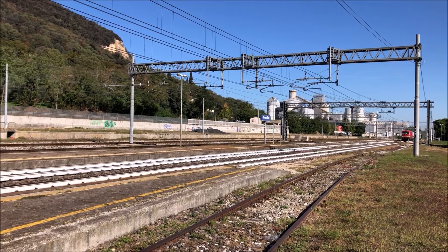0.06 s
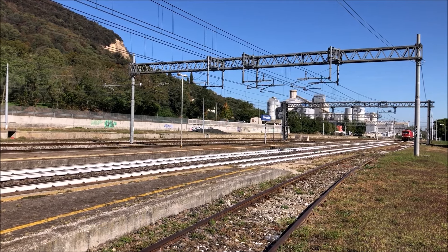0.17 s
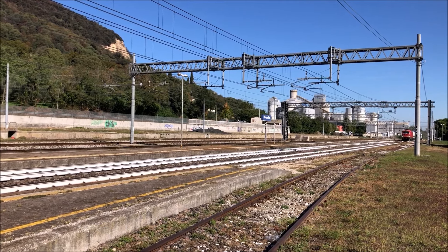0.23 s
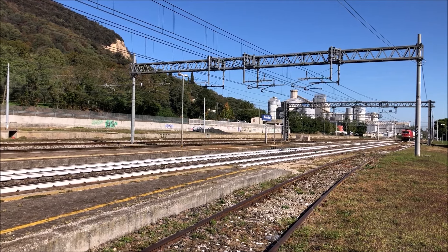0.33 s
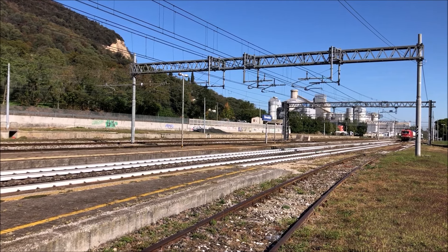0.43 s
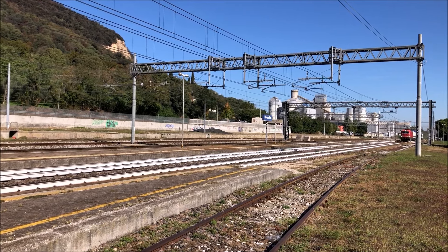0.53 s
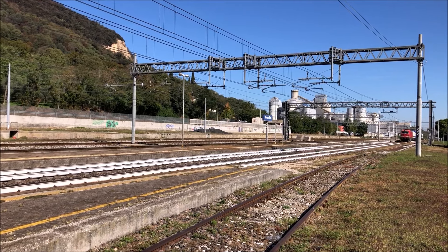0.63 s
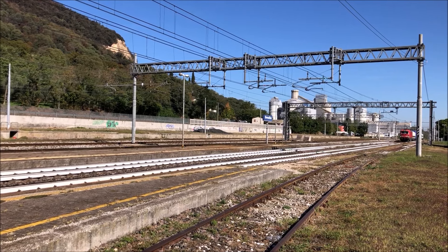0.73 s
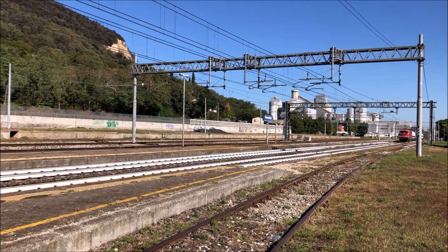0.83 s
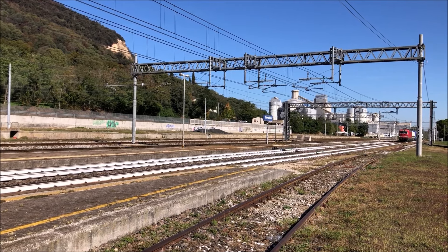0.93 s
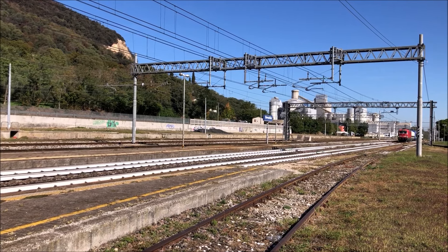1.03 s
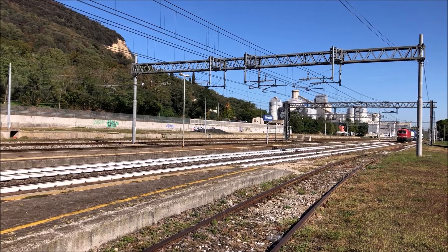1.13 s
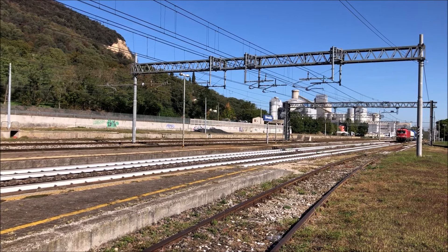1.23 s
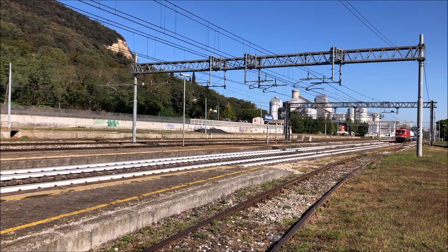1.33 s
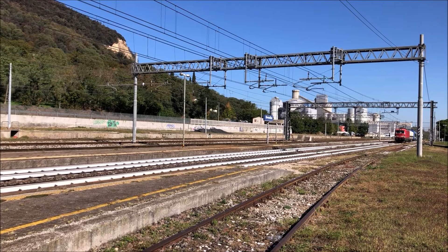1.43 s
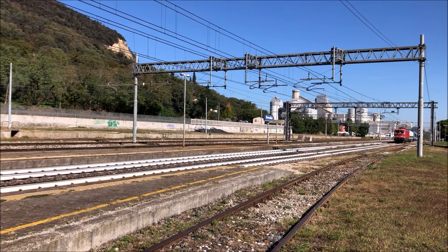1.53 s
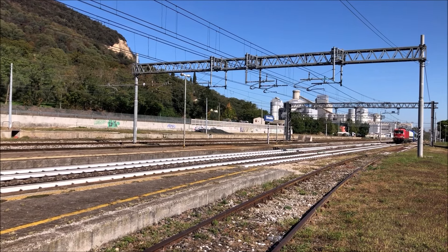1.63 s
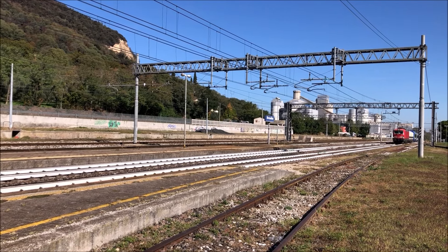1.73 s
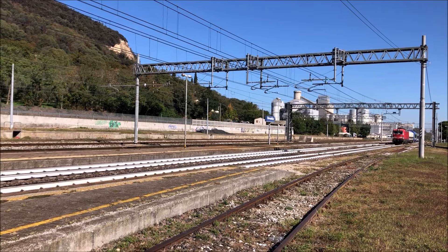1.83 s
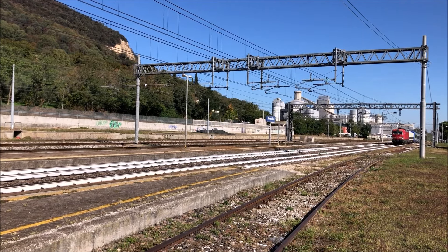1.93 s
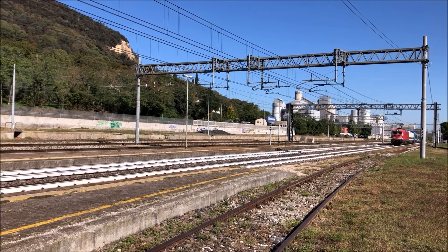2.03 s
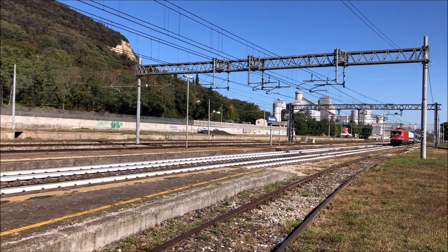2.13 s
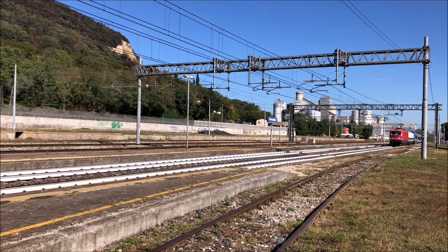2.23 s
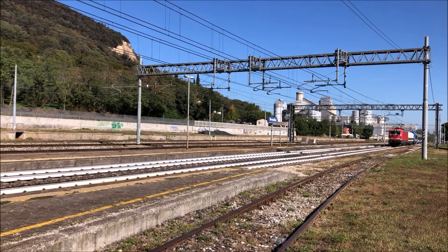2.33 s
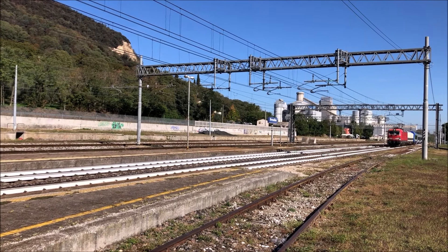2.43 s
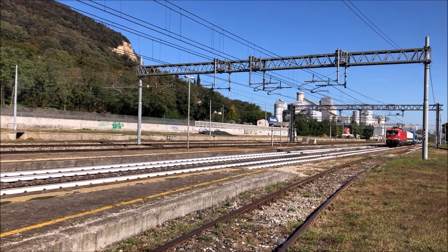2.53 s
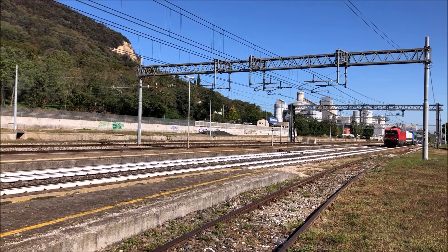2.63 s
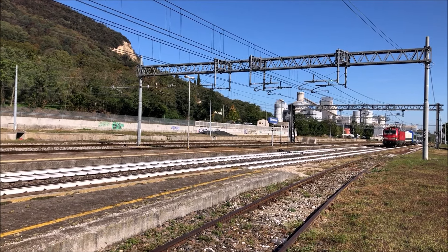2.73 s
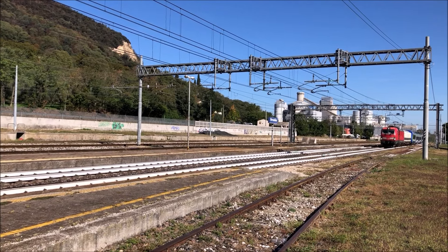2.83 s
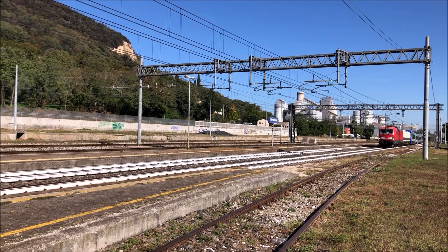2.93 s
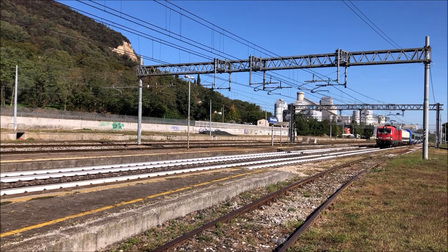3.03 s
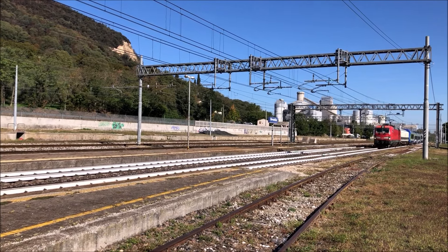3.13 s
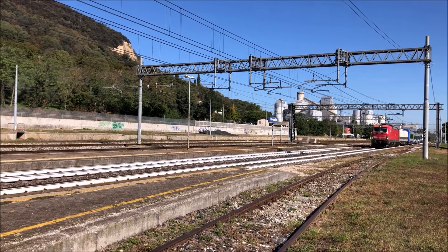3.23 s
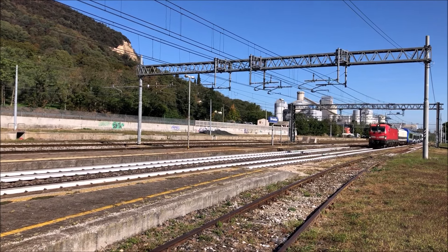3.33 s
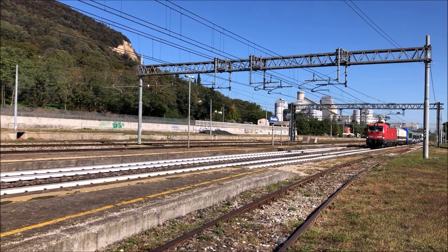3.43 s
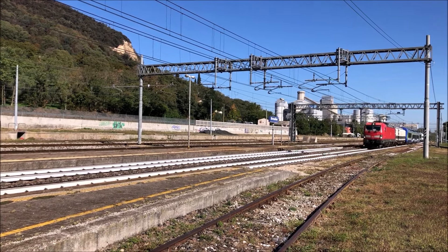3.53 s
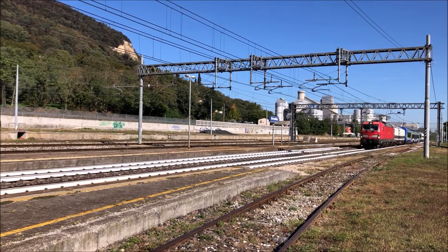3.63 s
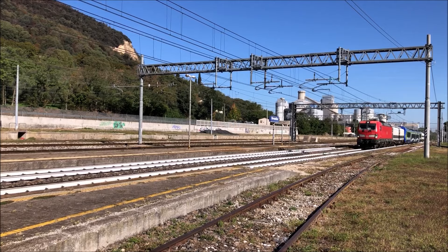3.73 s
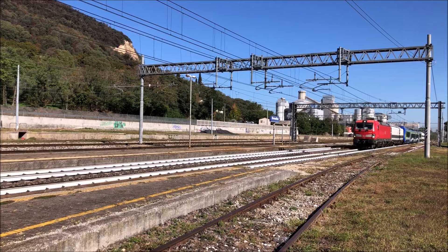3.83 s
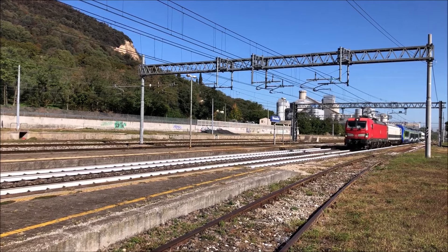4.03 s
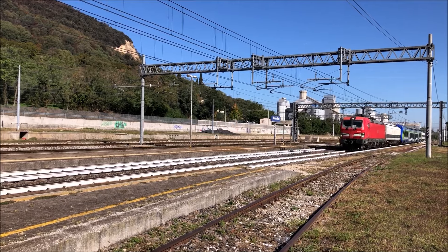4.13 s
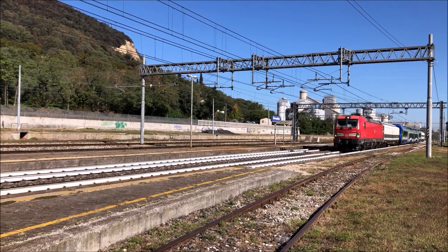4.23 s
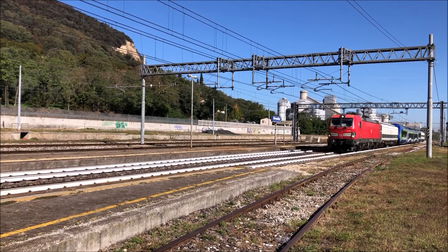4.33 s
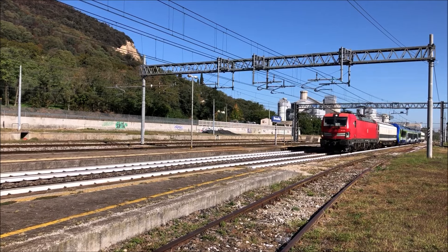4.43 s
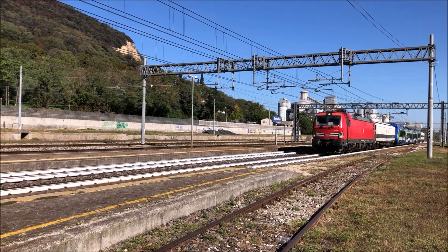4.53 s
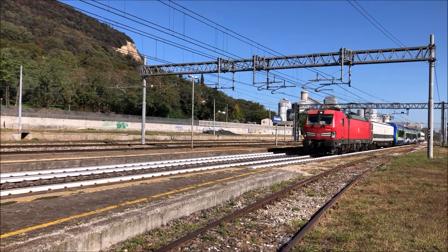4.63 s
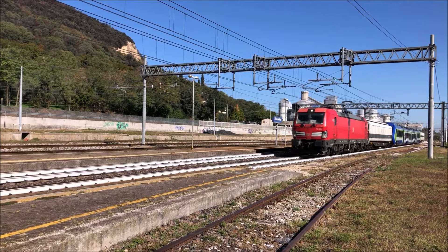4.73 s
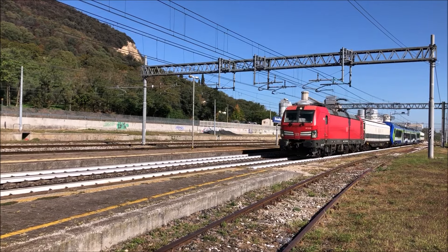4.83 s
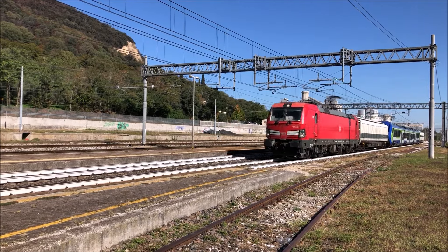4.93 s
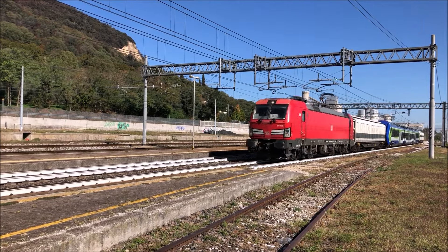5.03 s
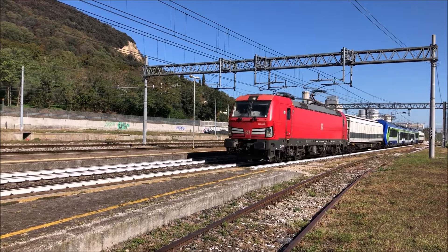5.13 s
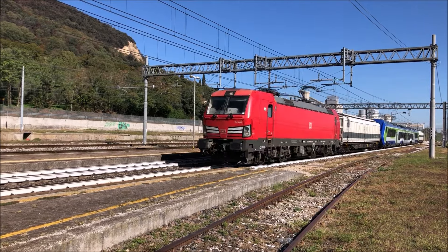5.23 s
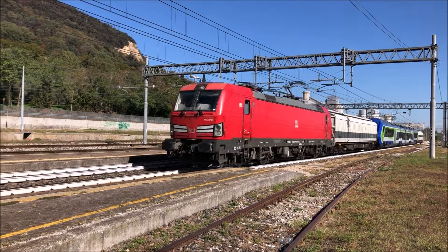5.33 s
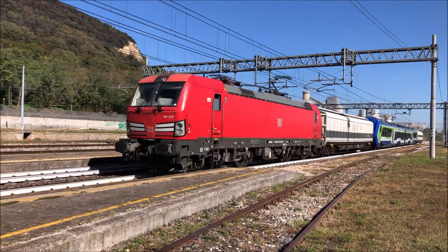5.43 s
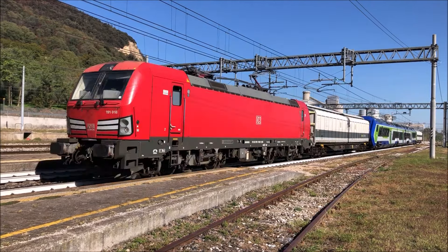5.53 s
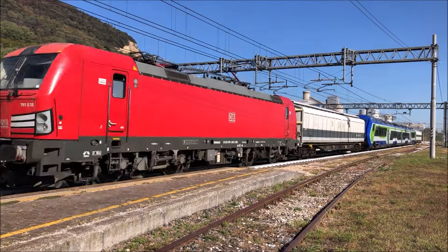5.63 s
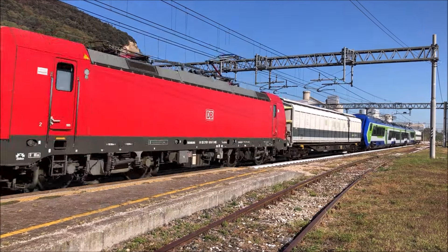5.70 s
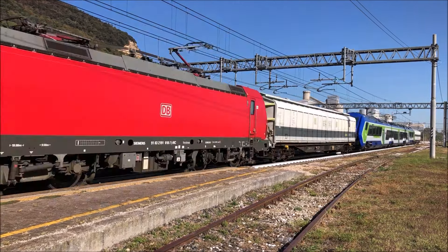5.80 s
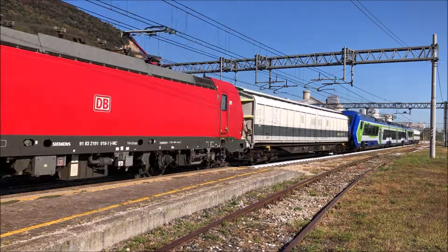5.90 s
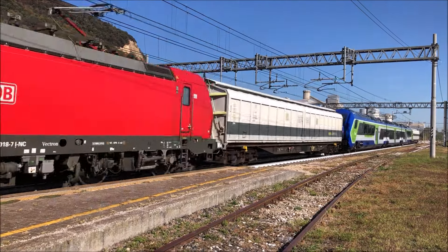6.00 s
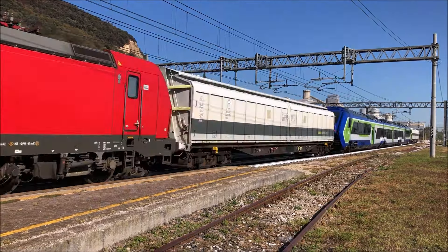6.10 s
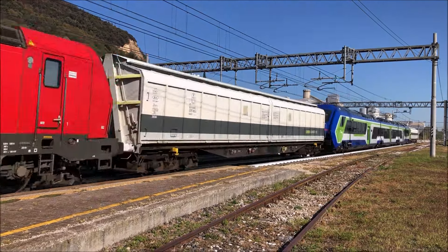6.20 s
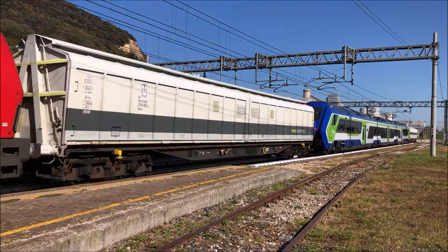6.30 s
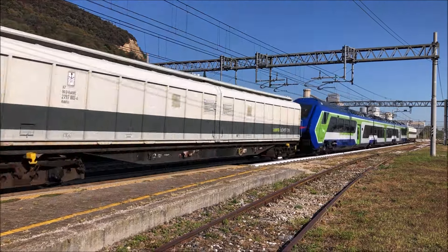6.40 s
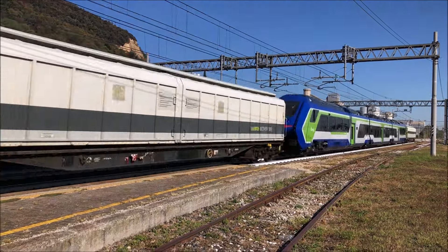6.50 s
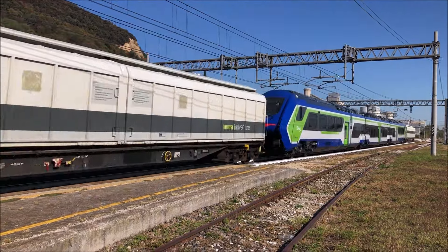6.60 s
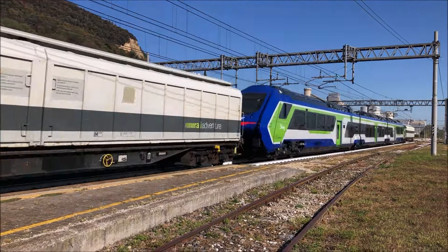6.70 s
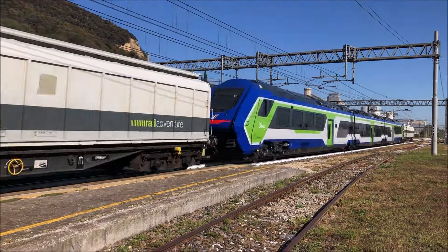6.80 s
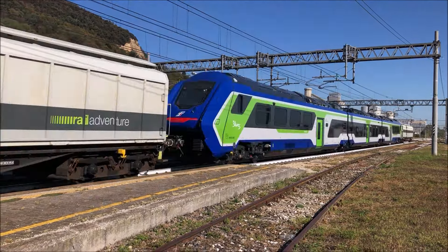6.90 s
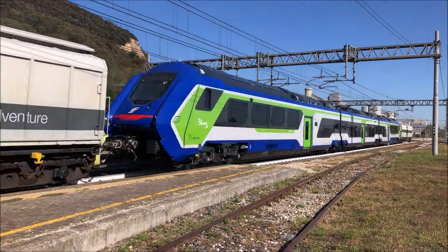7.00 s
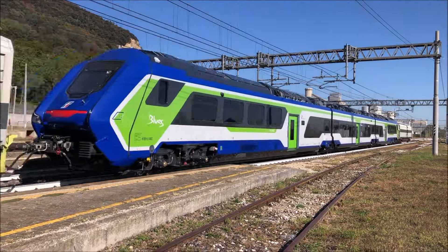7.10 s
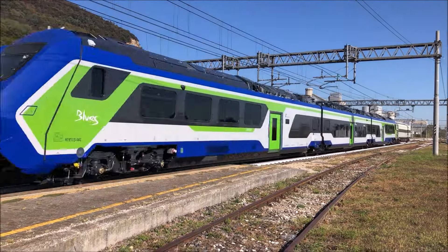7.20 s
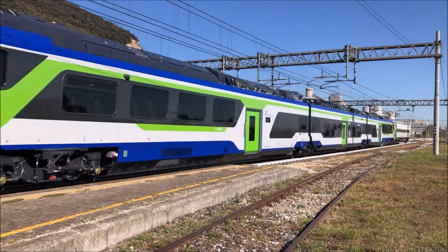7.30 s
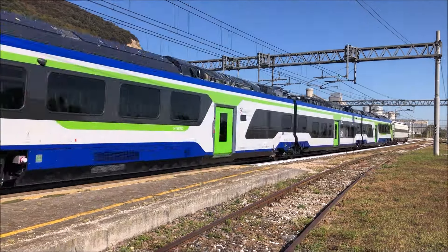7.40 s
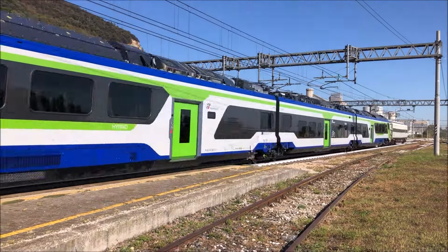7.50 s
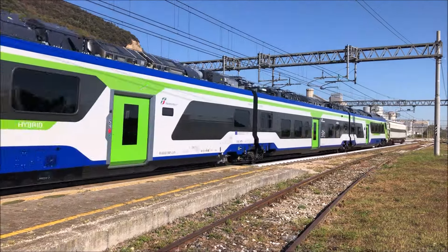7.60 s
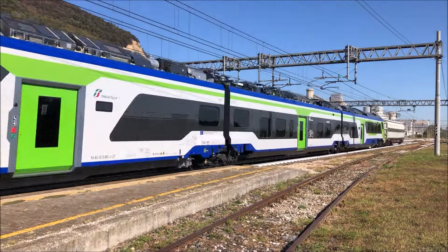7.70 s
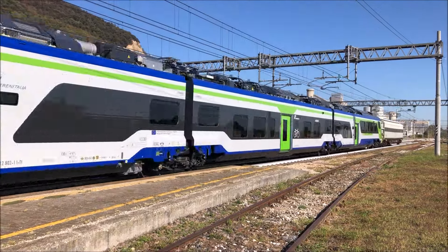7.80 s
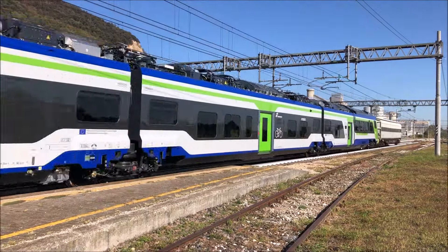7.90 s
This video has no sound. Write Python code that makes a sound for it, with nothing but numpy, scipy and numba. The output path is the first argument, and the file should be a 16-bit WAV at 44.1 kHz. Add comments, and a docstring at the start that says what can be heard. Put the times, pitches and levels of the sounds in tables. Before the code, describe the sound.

A fixed microphone beside the track picks up quiet wind rumble and soft thumps. Six bright, reedy horn calls at one pitch, the second longest, ring out with slightly lower echoes and push down the background. Soon the locomotive roars by, high wheel tones sliding downward, followed by wagons and coaches with rattling, clanking bogies still passing at the end.

```python
"""At a station platform, an electric locomotive nears at speed, sounds its air horn six times and hauls its train by.
The horn sums swept partials; delayed copies return from masts, a wall and small things, late and lower in pitch.
Coloured noise makes rumble, rolling, hiss and breeze; struck modes make the wheel clatter, slow sines the buffets.
The microphone's gain control ducks everything under the horn."""
import sys
import numpy as np
from scipy import signal
from scipy.fft import rfft, irfft, next_fast_len
from scipy.io import wavfile
from scipy.ndimage import uniform_filter1d, minimum_filter1d
from numba import njit

SR = 44100
rng = np.random.default_rng(int(sys.argv[2]) if len(sys.argv) > 2 else 0)


def store_pcm(level_fs):
    """Save levels as 16-bit WAV."""
    pcm = np.round(np.clip(level_fs, -1, 1) * 32767).astype(np.int16)
    wavfile.write(sys.argv[1], SR, np.atleast_2d(pcm).T)


N = 350595

SPEED_M_PER_S, PASS_S, TRACK_M, SOUND_M_PER_S = 26.4, 5.8, 5, 343

# breeze, gust and their spectrum: (frequency [Hz], gain [dB])
BREEZE_DB, GUST_DB, GUST_STARTS_S, GUST_ENDS_S = -44.7, -41.3, .9, 3.8
BREEZE_COLOUR = [(20, -30), (40, -14), (62, 0), (78, 0), (108, -3.5), (135, -8.5), (200, -17.5), (400, -62)]
# wind buffets: (time [s], frequency [Hz], width [s], peak level [dB])
BUFFETS = [(.92, 75, 0.017, -28.5), (1.035, 79.3, 0.0077, -25), (1.108, 122.6, 0.0067, -21),
           (1.17, 85.3, .012, -30), (1.335, 110.6, 0.014, -31.5)]

# spectra of the rolling noise: (frequency [Hz], gain [dB])
RUMBLE_COLOUR = [(20, -34), (40, -21), (62, -1.5), (78, -0.5), (108, 0), (135, -7.5), (200, -17),
                 (400, -64)]
BODY_COLOUR = [(90, -26), (160, 1), (230, -0.5), (330, -2), (410, -6.5), (540, -5), (640, -3), (760, -8.5),
               (1100, -16), (2500, -83)]
RAIL_COLOUR = [(450, -6.5), (850, -0.5), (1100, -1), (1260, 3.5), (1385, 6.5), (1620, -1.5), (1950, 0),
               (2320, -.5), (2600, -12.5), (3400, -44), (6000, -54)]
HISS_FAR_COLOUR = [(1500, -19), (2900, 5.5), (4200, -1.5), (6000, -11.5), (8000, -18), (12000, -34),
                   (16000, -38)]
HISS_NEAR_COLOUR = [(1500, -23), (2900, 1.5), (4200, -1), (6300, -4), (8200, -8), (11000, -10.5),
                    (16000, -14)]
RATTLE_COLOUR = [(1500, -2), (2600, -5), (4000, 0), (8000, -3), (15000, -10)]
# growth of each rolling part, before bogie swells: (draws level [s], level alongside [dB], reach [m],
# trend along the train [dB/s], level carried by the track at no distance [dB], its loss [dB/m])
RUMBLE_PASS = (7.0, -28.3, 12.5, 2, -45, .13)
BODY_PASS = (6.3, -28.8, 8.5, 2.0, -47.5, .016)
RAIL_PASS = (6, -28.1, 9.3, -3.5, -37.8, .064)
HISS_PASS = (6.0, -39.5, 2.5, 0, -45, 0.07)
# bogies going by: (time [s], rumble swell [dB], body swell [dB], hiss swell [dB]); rails get half the body swell
BOGIES = [(6.18, 0, 0.5, 2.5), (6.52, 1.5, 2.2, .5), (6.84, 1, 2, 4), (7.2, 0, 1.5, 3), (7.46, 1.5, 4.5, 7),
          (7.71, 6, 4.5, -0.5), (7.83, 1.5, 1.5, 2.5)]
BOGIE_WIDTH_S = .052

# flange brushing the rail far off: (time [s], width [s], level [dB])
FLANGE = (2.126, 0.06, -47.5)
# hiss of the locomotive's running gear: (time [s], width [s], level [dB])
LOCO_HISS = (6.19, 0.21, -39.5)
# its spectrum: (frequency [Hz], gain [dB])
LOCO_HISS_COLOUR = [(3000, -25), (5500, -2), (8000, 2), (11000, -2), (16000, -11)]

# wheel tones before Doppler: (frequency [Hz], width [Hz], level [dB], loudest at [s])
WHEEL_TONES = [(5430, 120, -39.5, 6.15), (6400, 110, -42, 6.24), (7840, 220, -41, 6.0),
               (14300, 350, -48, 6.5)]
# wheels striking rail joints: (time [s], relative thud level [dB], relative clank level [dB])
JOINTS = [(4.72, -32, -55), (4.90, -33, -55), (6.160, -26, -42), (6.488, -31, -31.5), (6.80, -23, -28),
          (6.85, -24, -34), (7.084, -31, -34), (7.309, -34, -31), (7.405, -21, -24.5), (7.431, -30, -20.5),
          (7.467, -20, -20.5), (7.659, -18, -41), (7.70, -18.5, -30.5)]
# modes of a struck wheel: (frequency [Hz], relative level [dB], t60 [s])
WHEEL_MODES = [(617, -2, 0.13), (862, 0, 0.17), (1730, 1, 0.18), (2300, -4, 0.18), (2680, -3, 0.22),
               (3080, -4.5, .15), (3590, -4.5, .2), (5460, -9, .15)]
# spectra of a wheel blow: (frequency [Hz], gain [dB])
THUD_COLOUR = [(50, -25), (110, -3), (260, 18), (600, -11), (1400, -20), (6000, -45)]
CRASH_COLOUR = [(400, -5), (900, 2), (2500, -3.5), (6000, -5), (15000, -23)]

# masts and gantries that return the horn: (up the line [m], across [m], gain before colouring [dB])
MASTS = [(69.8, 6, -23.5), (110.6, 6.8, -45.5)]
WALL_M, WALL_DB = 47, -21
# spectra of the echoes and of the smear: (frequency [Hz], gain [dB])
ECHO_COLOUR = [(700, -1.5), (1500, 1.5), (2200, 13), (3000, 1), (4000, 2), (7000, 1.5), (11000, -9.5),
               (16000, -5)]
SMEAR_COLOUR = [(750, -7.5), (1500, -3), (2300, -2), (3000, 4.5), (5000, 3.5), (9000, 1), (16000, -6)]

# presses of the horn valve: (opens [s], shuts [s], relative level [dB], pitch overshoot [Hz],
# fundamental trim [dB], third partial trim [dB], treble tilt [dB/decade], echo trim [dB], attack [s])
PRESSES = [(2.689, 2.833, -1.5, 41.4, -2.5, -1.5, -7, 7, .005),
           (3.002, 3.404, -1.5, 25, -1, -1, -8, 5, .006), (3.610, 3.720, -.5, 18.5, .5, -2, -4.5, 1.5, .01),
           (4.148, 4.278, -4, 26.3, 6, -1, 4, 2.5, .018), (4.473, 4.594, -3, 20.8, 5, 3, 6, -2, 0.0076),
           (5.001, 5.112, 0.5, 38, -1.5, 3.5, 8, -8.5, .0037)]
HORN_HZ, SAG_HZ_PER_S, EMPTY_S, HORN_DB = 746.06, 804, 0.045, 3
# spectrum that sets the horn partials: (frequency [Hz], relative level [dB])
HORN_SPECTRUM = [(747, -1.5), (1494, -1), (2240, -18.5), (2990, -19.5), (3735, -16.5), (4480, -25.5),
                 (5230, -24.5), (6700, -27.5), (8200, -30), (11200, -33), (12700, -41.5), (15700, -47)]
# air pressure faltering in the long blast: (time [s], width [s], depth as time of sag [s])
FALTERS = [(3.132, 0.0095, 0.0206), (3.271, 0.0098, 0.02)]
# spectrum of the air rush: (frequency [Hz], gain [dB])
RUSH_COLOUR = [(1200, -25), (3500, 0), (9000, -2), (16000, -7)]

TOP_HZ = 15850


def undb(db):
    """Decibels to amplitude."""
    return 10 ** (np.asarray(db) / 20)


def unit(x):
    """Scale to rms 1."""
    return x / np.sqrt(np.mean(x ** 2))


def read_db(points, hz):
    """Level of a spectrum at any frequency, interpolated over log frequency."""
    f, db = np.transpose(points)
    return np.interp(np.log(np.maximum(hz, 1)), np.log(f), db)


def colour(x, points):
    """Filter by a spectrum of (Hz, dB) points."""
    size = next_fast_len(len(x) + 2048)
    gain = undb(read_db(points, np.fft.rfftfreq(size, 1 / SR)))
    return irfft(rfft(x, size) * gain, size)[:len(x)]


def walk(rate_hz, size=N):
    """Random wander between knots at a rate, with a spread near 1."""
    at = np.arange(size) / SR * rate_hz
    return np.interp(at, np.arange(8192), rng.standard_normal(8192)) * np.sqrt(3 / 2)


def bump(at_s, width_s):
    """A bell-shaped swell, 1 at its top."""
    return np.exp(-((np.arange(N) / SR - at_s) / width_s) ** 2 / 2)


def add(track, start_s, x):
    """Mix a sound in at a time."""
    i = int(start_s * SR)
    track[i:i + len(x)] += x[:N - i]


def wind(rise_s=.12, fall_s=.5):
    """The breeze rumbles on the microphone and gusts once; small eddies thump it for a few cycles each."""
    t = np.arange(N) / SR
    gust = undb(GUST_DB) * np.clip((t - GUST_STARTS_S) / rise_s, 0, 1)
    gust = gust * np.clip((GUST_ENDS_S - t) / fall_s, 0, 1)
    rumble = unit(undb(2 * walk(12)) * colour(rng.standard_normal(N), BREEZE_COLOUR))
    out = np.hypot(undb(BREEZE_DB), gust) * rumble
    for s, hz, width_s, db in BUFFETS:
        out += undb(db) * bump(s, width_s) * np.sin(2 * np.pi * (hz * t + rng.random()))
    return out


def approach(arrives_s, beside_db, reach_m, trend_db_per_s, carried_db, loss_db_per_m):
    """Rolling gain: the track carries a little far ahead; the rest wells up over the last metres and stays."""
    since_s = np.arange(N) / SR - arrives_s
    gap_m = SPEED_M_PER_S * np.maximum(-since_s, 0)
    beside = undb(beside_db + trend_db_per_s * np.maximum(since_s, 0)) / (1 + (gap_m / reach_m) ** 2)
    carried = undb(carried_db - loss_db_per_m * gap_m)
    return np.hypot(carried, beside)


def rolling(points, flicker_db, flicker_hz, grit=0.):
    """Rough steel on steel: dense knocks of uneven size, in a resonant colour, with a restless level."""
    knocks = rng.standard_normal(N) * np.exp(grit * rng.standard_normal(N))
    return unit(colour(knocks, points) * undb(flicker_db * walk(flicker_hz)))


def rattle(count=320, spread_db=4.0, ring_share=.25, tick_db=6, tick_s=.0015):
    """Loose steel under the wagons: random ticks of uneven size, each with a short ring."""
    out, t = np.zeros(N), np.arange(SR // 16) / SR
    times_s = rng.random(count) * N / SR
    sizes = np.minimum(rng.exponential(size=count), 3.5)
    for s, size in zip(times_s, sizes):
        ring = 0
        for hz, db, t60_s in WHEEL_MODES:
            decay = undb(db - 60 * t / (ring_share * t60_s))
            ring = ring + decay * rng.standard_normal() * np.sin(2 * np.pi * hz * t)
        tick = undb(tick_db) * rng.standard_normal(len(t)) * np.exp(-t / tick_s)
        add(out, s, undb(spread_db * size) * (ring / 2 + tick))
    return unit(colour(out, RATTLE_COLOUR))


def train(bright_m=10.0, rattle_db=-7):
    """Rumble, wagon bodies, rails and hiss, which brightens and rattles when close; bogies swell them all."""
    swells_db = sum(np.outer(dbs, bump(s, BOGIE_WIDTH_S)) for s, *dbs in BOGIES)
    rumble_swell, body_swell, hiss_swell = undb(swells_db)
    gap_m = SPEED_M_PER_S * np.maximum(HISS_PASS[0] - np.arange(N) / SR, 0)
    close = 1 / (1 + (gap_m / bright_m) ** 2)
    hiss = np.sqrt(1 - close) * rolling(HISS_FAR_COLOUR, 0.57, 20)
    hiss += np.sqrt(close) * rolling(HISS_NEAR_COLOUR, 1.0, 55, grit=0.53)
    hiss += close * undb(rattle_db) * rattle()
    out = rumble_swell * approach(*RUMBLE_PASS) * rolling(RUMBLE_COLOUR, 1.7, 16)
    out += body_swell * approach(*BODY_PASS) * rolling(BODY_COLOUR, 1.16, 25)
    out += np.sqrt(body_swell) * approach(*RAIL_PASS) * rolling(RAIL_COLOUR, 0.78, 35, grit=0.25)
    return out + hiss_swell * approach(*HISS_PASS) * hiss


def hisses():
    """A flange brushes the rail far off; the locomotive's running gear hisses as it goes by."""
    out = np.zeros(N)
    for (s, width_s, db), points in [(FLANGE, HISS_FAR_COLOUR), (LOCO_HISS, LOCO_HISS_COLOUR)]:
        out += undb(db) * bump(s, width_s) * rolling(points, 1.0, 40)
    return out


def wheel_song(glide=0.054, swell_s=.15):
    """Thin high wheel tones swell in turn and slide down as the locomotive goes by."""
    doppler = 1 - glide * np.tanh((np.arange(N) / SR - 6.1) / .8)
    out = np.zeros(N)
    for hz, width_hz, db, s in WHEEL_TONES:
        level = undb(db) * bump(s, swell_s) * walk(width_hz)
        heard_hz = hz * doppler + width_hz / 2 * walk(200)
        out += level * np.sin(2 * np.pi * np.cumsum(heard_hz) / SR)
    return out


def clatter(decay_s=0.032, crash_db=-2, crash_s=0.016, rise_s=.002):
    """Each wheel blow thuds in the bogie, rings the wheel and shakes loose steel."""
    out, t = np.zeros(N), np.arange(SR // 4) / SR
    for s, thud_db, clank_db in JOINTS:
        thud = unit(colour(rng.standard_normal(len(t)), THUD_COLOUR)) * np.exp(-t / decay_s)
        crash = unit(colour(rng.standard_normal(len(t)), CRASH_COLOUR)) * np.exp(-t / crash_s)
        ring = 0
        for hz, db, t60_s in WHEEL_MODES:
            decay = undb(db + 3 * rng.standard_normal() - 60 * t / t60_s)
            ring = ring + decay * np.sin(2 * np.pi * (hz * t + rng.random()))
        clank = ring / 2 + undb(crash_db) * crash
        blow = undb(thud_db) * thud + undb(clank_db) * clank
        add(out, s, blow * (1 - np.exp(-t / rise_s)))
    return out


def ballast(x, wet_db=-9, decay_s=0.047, rise_s=0.0035, drift_s=.00012):
    """Stones, rails and wires smear the upper partials; moving air makes the two paths beat."""
    t, i = np.arange(SR // 3) / SR, np.arange(N)
    out = 0
    for _ in range(2):
        tail = rng.standard_normal(len(t)) * np.exp(-t / decay_s) * (1 - np.exp(-t / rise_s))
        wet = signal.fftconvolve(x, tail / np.sqrt(2 * np.sum(tail ** 2)))[:N]
        out = out + np.interp(i + drift_s * SR * walk(25), i, wet)
    return undb(wet_db) * colour(out, SMEAR_COLOUR)


def echo(x, along_m, across_m, onward_m):
    """Horn by way of a point: the path shrinks more slowly than the straight one, so the pitch is lower."""
    sent_s = np.linspace(0, N / SR, 200)
    place_m = SPEED_M_PER_S * (PASS_S - sent_s)
    straight_s = sent_s + np.hypot(place_m, TRACK_M) / SOUND_M_PER_S
    late_s = sent_s + (np.hypot(place_m - along_m, across_m) + onward_m) / SOUND_M_PER_S
    i = np.arange(N)
    return np.interp(np.interp(i, late_s * SR, straight_s * SR), i, x)


def yard(x, scatter_db=-32.7, fade_db_per_m=0.15, count=56):
    """Echoes from the wall, the masts and many small things strewn along the line and up the hillside."""
    out = undb(WALL_DB) * echo(x, 0, 2 * WALL_M, 0)
    for along_m, across_m, db in MASTS:
        out += undb(db) * echo(x, along_m, across_m, np.hypot(along_m, across_m))
    for k, (u, v) in enumerate(rng.random((count, 2))):
        along_m = 130 * u - 10
        across_m = 4 + 105 * ((k + v) / count) ** 2
        gain = undb(scatter_db - fade_db_per_m * (across_m + along_m / 2))
        out += gain * echo(x, along_m, across_m, np.hypot(along_m, across_m))
    # soft ground swallows the fundamental, air the top
    return colour(out, ECHO_COLOUR)


def toot(opens_s, shuts_s, overshoot_hz, first_db, third_db, tilt_db, attack_s, settle_s=0.0169,
         stop_s=0.0038, waver=0.0013, rasp=0.0045, shimmer_db=4.0, dispersion_rad=1.0,
         fade_db_per_s=190, rush_db=-32):
    """The diaphragm starts sharp, settles, sags as air runs out; the flare shifts each partial's phase."""
    t = np.arange(int((shuts_s - opens_s + 2 * EMPTY_S) * SR)) / SR
    since_shut_s = np.maximum(opens_s + t - shuts_s, 0)
    falter_s = sum(depth_s * np.exp(-((opens_s + t - s) / width_s) ** 2 / 2) for s, width_s, depth_s in FALTERS)
    sag_s = since_shut_s + falter_s
    hz = HORN_HZ + overshoot_hz * np.exp(-t / settle_s) - SAG_HZ_PER_S * sag_s
    unsteady = 1 + waver * walk(50.6, len(t)) + rasp * walk(1200, len(t))
    phase = 2 * np.pi * np.cumsum(hz * unsteady) / SR
    # air rushes through the throat once a cycle
    rush = unit(colour(rng.standard_normal(len(t)), RUSH_COLOUR))
    out = undb(rush_db + tilt_db) * rush * (1 + np.cos(phase)) / 2
    for k in np.arange(1, 22):
        trim_db = first_db if k == 1 else tilt_db * np.log10(k / 2)
        db = read_db(HORN_SPECTRUM, k * HORN_HZ) + trim_db + third_db * (k == 3)
        # air turbulence shakes the short waves most
        db = db + shimmer_db * np.log10(k + 1) * walk(29.1, len(t))
        # low partials fade first
        db = db - fade_db_per_s * sag_s / np.sqrt(k)
        out = out + undb(db) * np.sin(k * phase + dispersion_rad * k * k)
    return out * np.clip(t / attack_s, 0, 1) * np.exp(-np.maximum(since_shut_s - EMPTY_S, 0) / stop_s)


def horn():
    """All valve presses by the straight path, and the share of each sent to the echoes."""
    direct, spread = np.zeros(N), np.zeros(N)
    for opens_s, shuts_s, db, overshoot_hz, first_db, third_db, tilt_db, echo_db, attack_s in PRESSES:
        blast = toot(opens_s, shuts_s, overshoot_hz, first_db, third_db, tilt_db, attack_s)
        call = undb(HORN_DB + db) * blast
        add(direct, opens_s, call)
        add(spread, opens_s, undb(echo_db) * call)
    return direct, spread


def scene(smear_db=-6):
    """Wind and train, under the horn, its echoes and the smear of both over the ballast."""
    direct, spread = horn()
    echoes = yard(spread)
    horn_sound = direct + echoes + ballast(spread + undb(smear_db) * echoes)
    train_sound = train() + hisses() + wheel_song() + clatter()
    return (wind() + train_sound + horn_sound)[None]


@njit
def peak_follower(x, release):
    """Jumps to each peak and sinks slowly."""
    out, e = np.empty(len(x)), 0.
    for i in range(len(x)):
        e = max(abs(x[i]), e * (1 - release))
        out[i] = e
    return out


def limit(x, ceiling, release_s):
    """Look-ahead gain that holds the peaks at a ceiling."""
    gain = ceiling / np.maximum(peak_follower(x[0], 1 / (release_s * SR)), ceiling)
    return x * uniform_filter1d(minimum_filter1d(gain, size=128), size=128)


def record(dry):
    """A slow gain control ducks everything under the horn, a quick limiter follows; the top is cut."""
    ducked = limit(dry, ceiling=1.19, release_s=0.83)
    held = limit(ducked, ceiling=0.96, release_s=.03)
    return signal.sosfilt(signal.ellip(10, .1, 80, TOP_HZ, fs=SR, output="sos"), held)


dry = scene()
out = record(dry)
store_pcm(out)
```